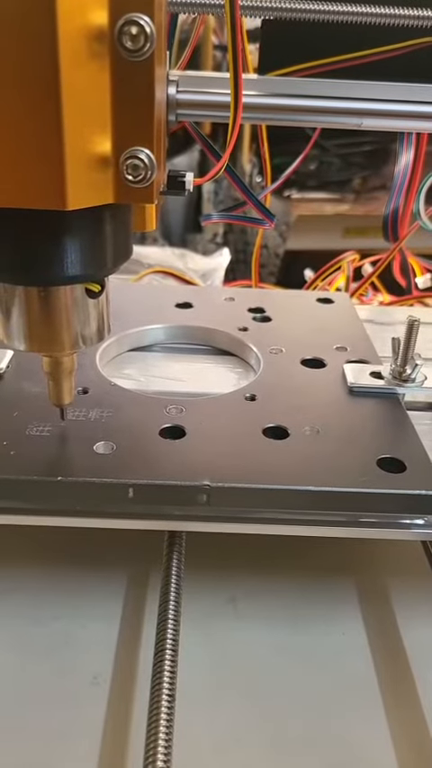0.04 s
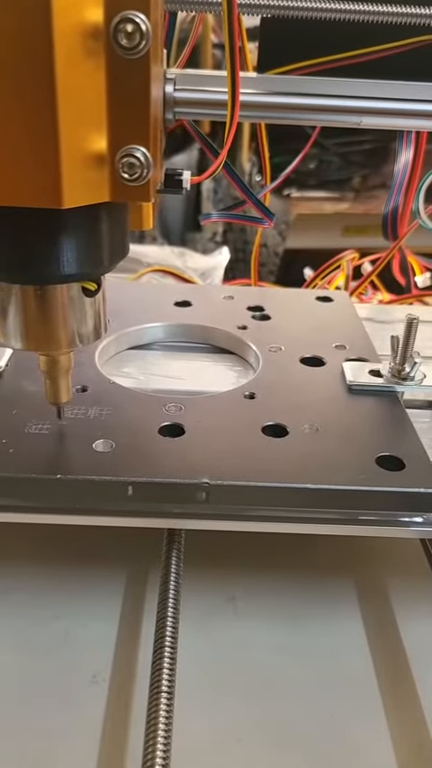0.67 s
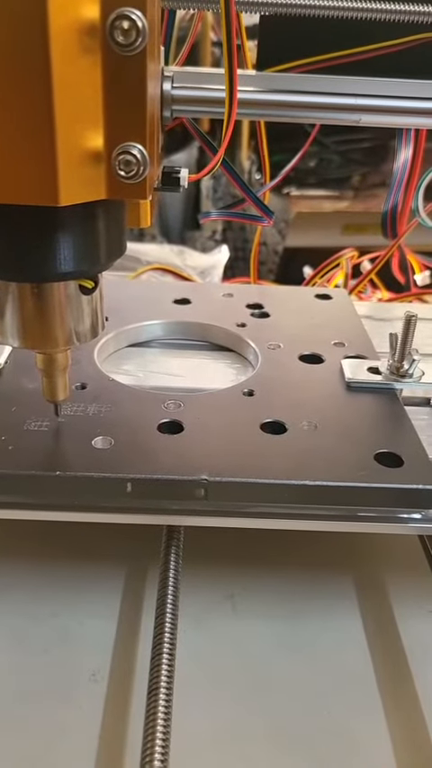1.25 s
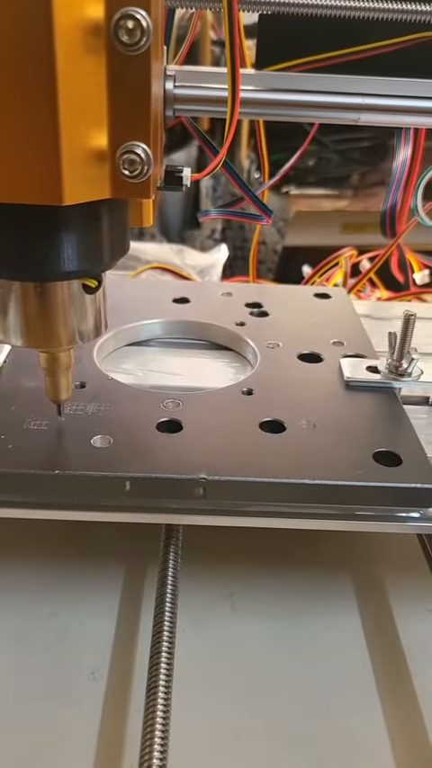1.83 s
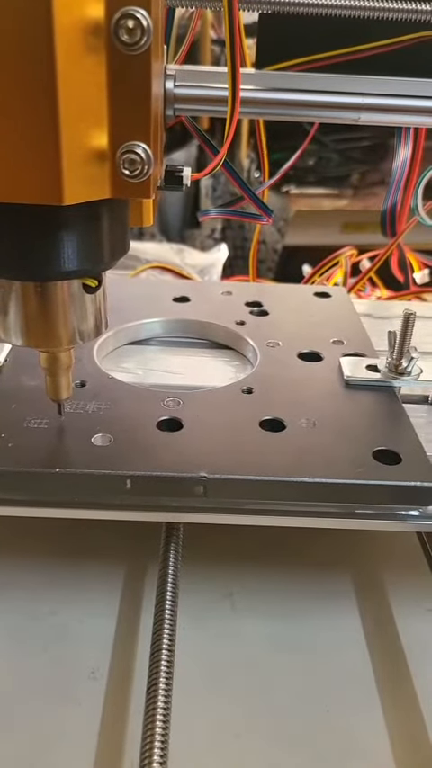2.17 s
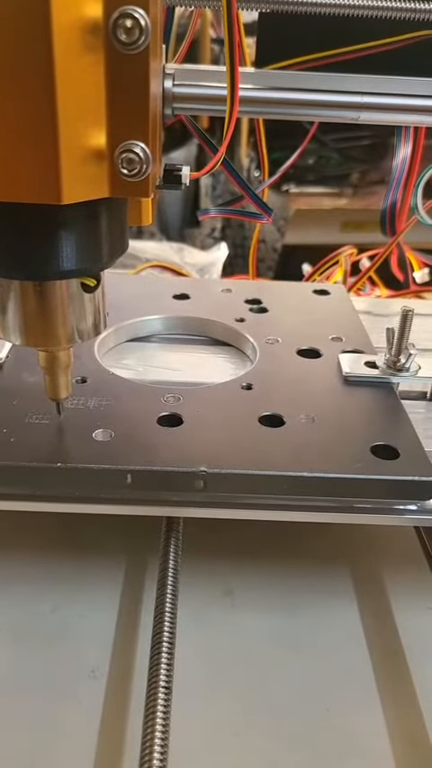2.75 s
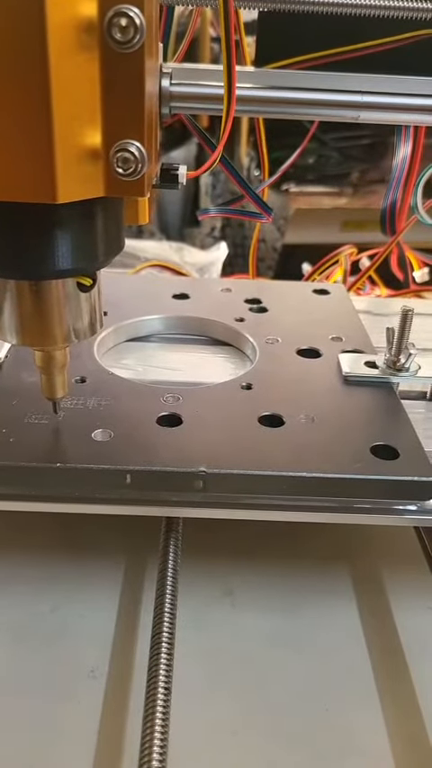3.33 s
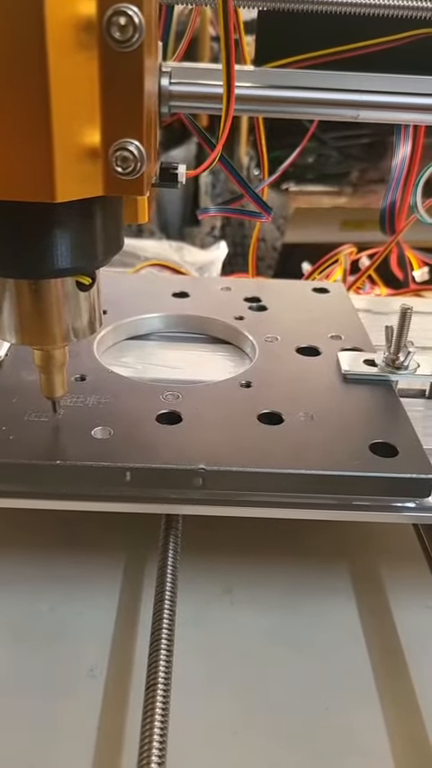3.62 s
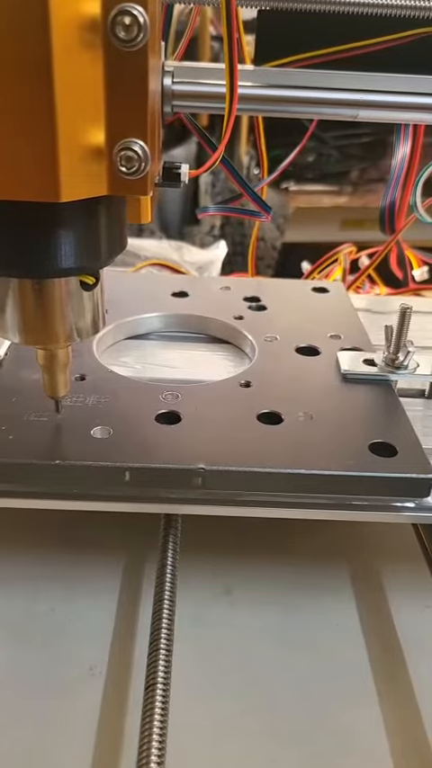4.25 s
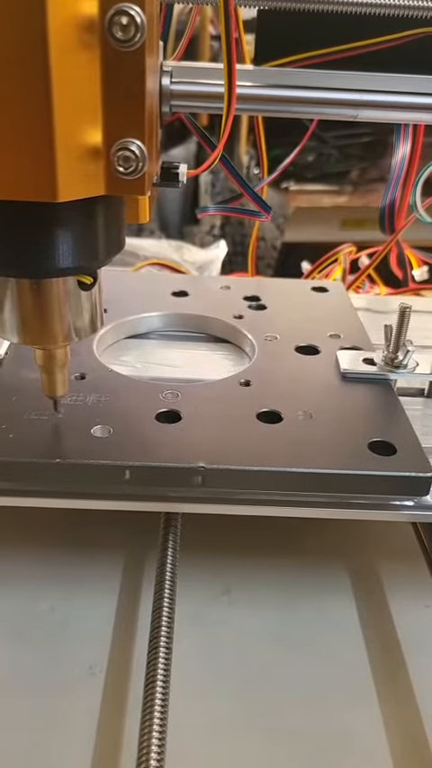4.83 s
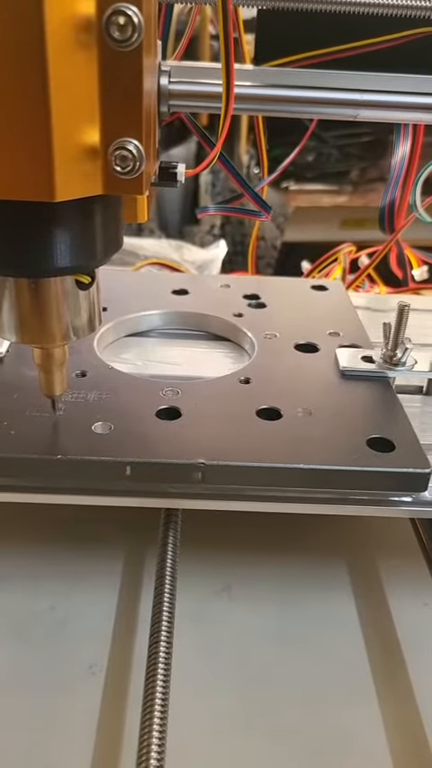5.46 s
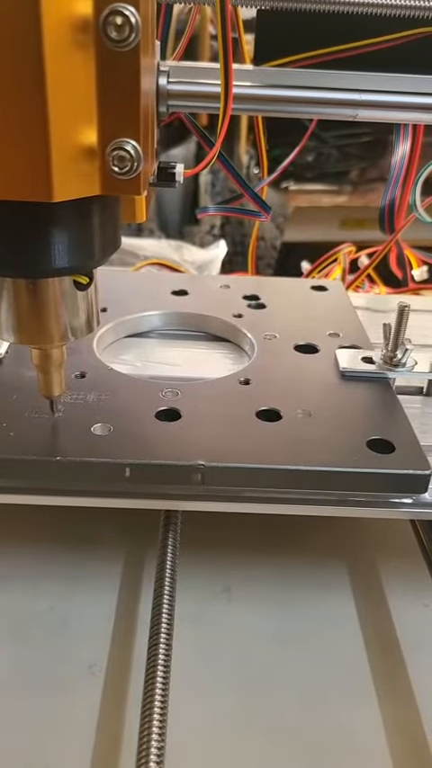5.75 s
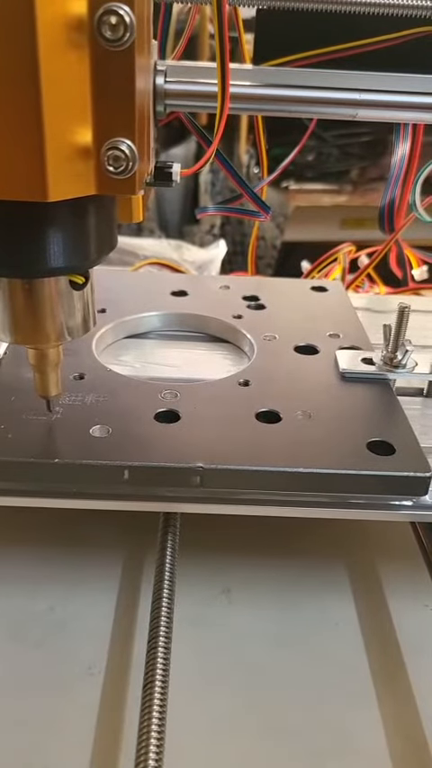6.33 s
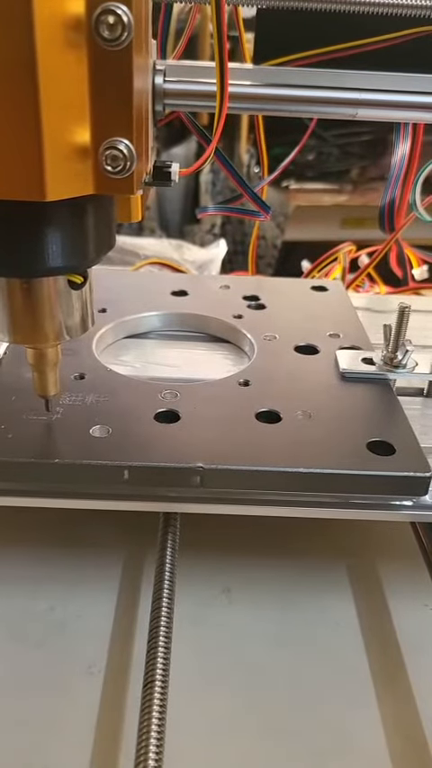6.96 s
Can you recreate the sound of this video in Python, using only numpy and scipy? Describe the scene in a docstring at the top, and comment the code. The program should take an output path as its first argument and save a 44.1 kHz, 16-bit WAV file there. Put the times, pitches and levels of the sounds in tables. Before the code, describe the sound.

A marking machine's pin hammers a metal plate in a fast, bright, buzzing steel chatter over a low motor hum.

```python
"""Dot-peen marking machine

Close up in a small workshop, a solenoid throws a pin at a clamped metal plate thirty times a second.
Each blow is a double knock: the pin strikes the plate, then slaps back against its stop.
Both knocks ring the frame and plate with a bright steel chatter, and the hammering sets the gantry
droning. Stepper motors sing briefly as they move the head, over a low motor hum and soft room tone."""
import sys
import numpy as np
from scipy import signal
from scipy.fft import rfft, irfft
from scipy.io import wavfile
from scipy.ndimage import uniform_filter1d

SR = 44100
rng = np.random.default_rng(int(sys.argv[2]) if len(sys.argv) > 2 else 0)


def generate_wav(sig):
    """Save sig (samples, or channels by samples) to the path in sys.argv[1] as 16-bit PCM at SR."""
    pcm = np.round(np.clip(np.atleast_2d(sig).T, -1, 1) * 32767).astype(np.int16)
    wavfile.write(sys.argv[1], SR, pcm)


N = 312669

# spectral shape of the room tone: frequency_hz, relative_level_db
ROOM_TONE_SPECTRUM = [(25, -28), (50, -33), (80, -5.5), (112, -8.5), (150, -6), (270, -11.5), (340, -8.5),
                      (550, -10.5), (1500, -11), (4000, -24.5), (14000, -38.5)]
# fader ride of the motor hum: time_s, level_db
HUM_RIDE = [(0, -42), (2.2, -41.5), (3.6, -46), (7.09, -48)]
# accents where the pin bites harder: start_s, blow_count, accent_db (before accent_scale)
ACCENTS = [(0.256, 2, 2.5), (1.072, 1, 3.2), (1.137, 1, 3.0), (1.398, 2, 2), (1.921, 2, 1.5), (3.096, 2, 3),
           (3.52, 1, 4), (3.846, 1, 2.5), (3.912, 1, 3), (4.205, 1, 2.5), (4.401, 3, 3), (5.217, 1, 0.5),
           (5.283, 1, 3.5), (6.262, 3, 3), (6.751, 1, 2), (6.98, 3, 4)]
# modes of frame, head and plate:
# pitch_hz, t60_s, strike_db, return_db, left_minus_right_db, left_lead_rad
BODY_MODES = [(102.6, 0.029, -17.5, -31.5, -2.5, 1.12), (115.5, 0.12, -24, -47, -2, 0.24),
              (195.2, 0.076, -23.5, -40.5, -3, 0.27), (239, 0.29, -34, -35.5, 5, -0.33),
              (440, 0.024, -33, -22.5, -2.5, 2.5), (463, 0.064, -31, -55, -20.5, 1.28),
              (574.3, 0.028, -23, -31.5, -18, 3), (709.8, 0.059, -51, -20.5, -8, 2.15),
              (721.3, 0.044, -28, -61, 13.5, 2.5), (1064, 0.0058, -10, -10, -7.5, 2.5),
              (1034, 0.02, -21.5, -29.5, -21, 2.5), (1231, 0.012, -11.5, -53, 15.5, -0.89),
              (1287.6, 0.034, -15.5, -31.5, -2.5, -2), (1413, 0.021, -65, -11.5, -1, 4),
              (1602, 0.022, -36, -20.5, 13, 3), (1833, 0.039, -16.5, -32.5, -0.5, 2.1),
              (2099, 0.024, -16.5, -29.5, -2, 1.0), (2411, 0.029, -24.5, -79, 17.5, -1.5),
              (2460, 0.0062, -39, -31, 11.5, -2.5)]
# clusters of high steel resonances: centre_hz, width_hz, strike_gain_db, return_gain_db
STEEL_BANDS = [(2820, 130, -18, -13), (3344, 43, -4, 3.5), (3806, 490, 2, -1), (5000, 500, -11, -45),
               (5650, 444, -1.5, -6), (6240, 150, -11, -20.5), (7320, 450, -9.5, -4), (8970, 77, -5.5, -4),
               (9260, 160, -8, -11), (10740, 260, -13.5, -5), (11900, 820, -28, -7.5),
               (13860, 660, -14, -6)]
# blows whose return hits the stop squarely and pings the sleeve: strike_s, ping_gain_db
SQUARE_RETURNS = [(2.117, 8), (2.541, 14), (2.704, 4.2), (3.944, 8), (4.075, 10), (5.968, 10), (6.066, 3.9),
                  (6.164, 2)]
# fader ride of the gantry drone: time_s, relative_level_db
DRONE_RIDE = [(0, -43), (2.2, -42), (2.9, -31), (4.3, -32), (5.7, -29), (7.09, -34)]
# short stepper runs along curved strokes: peak_s, half_length_s, pitch_hz, level_db
STEPPER_RUNS = [(0.44, 0.13, 290, -46), (2.483, 0.11, 284, -45), (2.66, 0.1, 289, -45),
                (5.35, 0.081, 278, -41), (5.567, 0.071, 293, -43), (6.014, 0.28, 294, -47.5)]

FIRST_BLOW_S, BLOW_PERIOD_S, RETURN_DELAY_S = .06021, .03264, .00595
SIDES = np.array([[1], [-1]])  # left, right


def undb(db):
    """Decibels to gain."""
    return 10 ** (np.asarray(db) / 20)


def unit(x):
    """Scale to rms 1."""
    return x / np.sqrt(np.mean(x ** 2))


def ride(table, t):
    """A fader move: straight lines between rows of time_s, level_db."""
    return np.interp(t, *np.array(table).T)


def band(x, hz, width_hz):
    """A resonance with gain 1 at its centre."""
    return signal.lfilter(*signal.iirpeak(hz, hz / width_hz, fs=SR), x)


def stereo_noise(correlation, size=N):
    """White noise on two channels, narrower as the correlation rises."""
    mid, side = rng.standard_normal((2, size))
    return (np.sqrt(1 + correlation) * mid + np.sqrt(1 - correlation) * side * SIDES) / np.sqrt(2)


def impulses(times_s, sizes):
    """A click of the given size at each time."""
    at = np.round(times_s * SR).astype(int)
    inside = (at >= 0) & (at < N)
    return np.bincount(at[inside], sizes[inside], N)


def convolve(x, response):
    """Play a sound through a response, channel by channel."""
    return signal.fftconvolve(np.atleast_2d(x), np.atleast_2d(response), axes=1)[:, :N]


def room_tone(level_db=-36.5, wide_above_hz=600):
    """A soft, steady bed of workshop air, narrowing to mono in the bass."""
    hz = np.arange(N // 2 + 1) * SR / N + 1
    point_hz, point_db = np.array(ROOM_TONE_SPECTRUM).T
    gain = undb(np.interp(np.log(hz), np.log(point_hz), point_db))
    mid, side = rfft(rng.standard_normal((2, N))) * gain
    width = np.minimum(hz / wide_above_hz, 1)
    return undb(level_db) * unit(irfft(mid + width * side * SIDES, N))


def motor_hum(pitch_hz=112, width_hz=31):
    """A motor hums under everything: a low, narrow band of noise."""
    hum = band(band(stereo_noise(0.82), pitch_hz, width_hz), pitch_hz, width_hz)
    return undb(ride(HUM_RIDE, np.arange(N) / SR)) * unit(hum)


def pin_blows(base_db=-1.33, scatter_db=0.61, return_scatter_db=2.0, accent_scale=1.28, limp_s=.2):
    """The solenoid's rhythm: time and force of every strike and return of the pin."""
    turn = np.arange(-2, int(N / SR / BLOW_PERIOD_S))
    beat_s = FIRST_BLOW_S + turn * BLOW_PERIOD_S
    force_draw, flight_draw, rebound_draw, limp_draw = rng.standard_normal((len(turn), 4)).T
    # strong and weak blows take turns; this limp comes and goes by chance
    limp_db = np.interp(beat_s / limp_s, np.arange(len(turn)), limp_draw) * (-1.) ** turn
    force_db = base_db + limp_db + scatter_db * force_draw
    for start_s, count, accent_db in ACCENTS:
        first = np.argmin(abs(beat_s - start_s))
        force_db[first:first + round(count)] = base_db + accent_scale * accent_db
    rebound_db = 0.46 * force_db + return_scatter_db * rebound_draw
    # a slow pin lands a little late, and its flight back is never quite the same
    strike_s = beat_s - .00008 * limp_db - .00004 * force_draw
    return_s = strike_s + RETURN_DELAY_S + .0001 * flight_draw
    return strike_s, force_db, return_s, rebound_db


def body_ring(strike_s, force_db, return_s, rebound_db, strike_scatter_db=1.37, return_scatter_db=3.0):
    """Both knocks ring the same modes; each dot lands on a new spot and shares its energy out anew."""
    out = np.zeros((2, N))
    for k, (hz, t60_s, strike_db, return_db, pan_db, lead_rad) in enumerate(BODY_MODES):
        strike_draw, return_draw = rng.standard_normal((len(strike_s), 2)).T
        bite = np.clip(hz / 2000, 0.16, 1.1)  # a harder blow mostly adds the high modes
        strikes = undb(strike_db + bite * (force_db + strike_scatter_db * strike_draw))
        returns = undb(return_db + bite * (rebound_db + return_scatter_db * return_draw))
        knocks = impulses(strike_s, strikes) + impulses(return_s, returns)
        pole = np.exp((2j * np.pi * hz - np.log(1000) / t60_s) / SR)
        rise = pole * np.exp(-2 * hz / SR)  # the ring builds up over its first cycle
        ring = (-1) ** k * signal.lfilter([0, pole - rise], [1, -pole - rise, pole * rise], knocks)
        placement = undb(SIDES * pan_db / 2) * np.exp(1j * SIDES * lead_rad / 2)
        out += (placement * ring).imag
    return out


def chatter(times_s, force_db, rise_ms, fall_ms, repeat_share, scatter_db, grit_db=3.5):
    """Steel chatters on steel in tiny uneven contacts: a share repeats at each knock, the rest is new."""
    ms = 1000 * np.arange(2048) / SR
    envelope = unit((1 - np.exp(-ms / rise_ms)) ** 2 * np.exp(-ms / fall_ms))
    knocks = impulses(times_s, undb(force_db + scatter_db * rng.standard_normal(len(times_s))))
    hiss = stereo_noise(0)
    flicker = unit(uniform_filter1d(rng.standard_normal(N), size=24))
    contacts = unit(hiss * undb(grit_db * flicker))
    repeated = convolve(knocks, envelope * stereo_noise(0, size=len(ms)))
    fresh = convolve(knocks, envelope) * contacts
    return np.sqrt(repeat_share) * repeated + np.sqrt(1 - repeat_share) * fresh


def pin_ticks(strike_s, force_db, return_s, rebound_db, slide_db=-38, tick_db=-26, slap_db=-31):
    """The bright top layer: the pin slides down its guide, ticks on the plate and slaps its stop."""
    slide = undb(slide_db) * chatter(strike_s - .0025, force_db, rise_ms=0.67, fall_ms=0.79,
                                     repeat_share=0, scatter_db=2.5)
    tick = undb(tick_db) * chatter(strike_s, 1.44 * force_db, rise_ms=0.27, fall_ms=3.05,
                                   repeat_share=0.29, scatter_db=1.36)
    steel = 0
    for hz, width_hz, strike_db, return_db in STEEL_BANDS:
        # the pin meets its stop at a new angle each time, and the highest resonances feel that most
        slap = undb(slap_db) * chatter(return_s - .0006, rebound_db, rise_ms=.4, fall_ms=3.2,
                                       repeat_share=.5, scatter_db=4.5 * hz / 12000)
        steel += band(undb(strike_db) * (tick + slide) + undb(return_db) * slap, hz, width_hz)
    pin_ring = undb(-6) * band(tick, hz=5700, width_hz=54)  # the pin itself sings on between blows
    return steel + pin_ring


def head_rattle(return_s, rebound_db, head_db=-24, sleeve_db=-26, ring_db=-18, ping_db=-19):
    """The return shakes the loose parts of the head and leaves the pin's sleeve ringing."""
    shake = chatter(return_s, rebound_db / 2, rise_ms=.4, fall_ms=4.2, repeat_share=0, scatter_db=.7)
    strike_s, ping_gain_db = np.array(SQUARE_RETURNS).T
    square_hits = chatter(strike_s + RETURN_DELAY_S, ping_gain_db, rise_ms=0.51, fall_ms=2.7,
                          repeat_share=0.74, scatter_db=-4)
    loose_parts = undb(head_db) * band(band(shake, 1420, 670), 1420, 670)
    sleeve = undb(sleeve_db) * band(band(shake, 1800, 410), 1800, 410)
    sleeve_ring = band(undb(ring_db) * shake + undb(ping_db) * square_hits, hz=1872, width_hz=85)
    return loose_parts + sleeve + sleeve_ring


def gantry_drone(return_s, start_hz=693.3, sag_hz_per_s=1.27, width_hz=32, trim_db=-8, pan_db=-7):
    """The knocking keeps the gantry droning; its resonance sinks and swells as the head travels."""
    t = np.arange(N) / SR
    carrier = np.exp(2j * np.pi * np.cumsum(start_hz - sag_hz_per_s * t) / SR)
    knocks = impulses(return_s, np.ones(len(return_s)))
    decay = np.exp(-np.pi * width_hz / SR)
    ring = carrier * signal.lfilter([1], [1, -decay], knocks / carrier)  # a gliding resonator
    level_db = trim_db + ride(DRONE_RIDE, t) + pan_db * SIDES / 2
    return -undb(level_db) * unit(ring.real)


def room_tail(x, wet_db=-15, t60_s=0.14, predelay_s=0.0024, band_hz=(800, 9000)):
    """Benches and walls return a short diffuse tail; the bass stays close and dry."""
    t = np.arange(SR // 2) / SR
    fade_in = np.clip(t / predelay_s - 1, 0, 1)
    tail = stereo_noise(0, size=len(t)) * np.exp(-np.log(1000) * t / t60_s) * fade_in
    tail /= np.sqrt(np.sum(tail ** 2, axis=1, keepdims=True))
    tail = signal.sosfilt(signal.butter(1, band_hz, "bandpass", fs=SR, output="sos"), tail)
    return undb(wet_db) * convolve(x, tail)


def stepper_notes():
    """The steppers sing a short, swelling note as they steer the head along a curved stroke."""
    t = np.arange(N) / SR
    out = np.zeros(N)
    for peak_s, half_length_s, pitch_hz, level_db in STEPPER_RUNS:
        swell = np.cos(np.pi / 2 * np.clip((t - peak_s) / half_length_s, -1, 1)) ** 2
        out += undb(level_db) * swell * np.sqrt(2) * np.sin(2 * np.pi * pitch_hz * t)
    return out


def scene():
    """The mix: the hammering head up front with its room tail, over drone, motors and room tone."""
    strike_s, force_db, return_s, rebound_db = pin_blows()
    head = body_ring(strike_s, force_db, return_s, rebound_db)
    head += pin_ticks(strike_s, force_db, return_s, rebound_db)
    head += head_rattle(return_s, rebound_db)
    return head + room_tail(head) + gantry_drone(return_s) + motor_hum() + stepper_notes() + room_tone()


def record(dry, low_cut_hz=45, high_cut_hz=14200):
    """The microphone loses the deep bass, and a steep high cut takes off the top."""
    thinned = signal.sosfilt(signal.butter(2, low_cut_hz, "highpass", fs=SR, output="sos"), dry)
    return signal.sosfilt(signal.ellip(8, .2, 70, high_cut_hz, fs=SR, output="sos"), thinned)


dry = scene()
out = record(dry)
generate_wav(out)
```